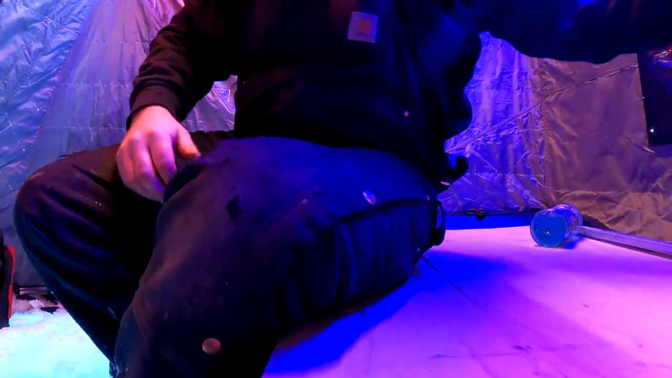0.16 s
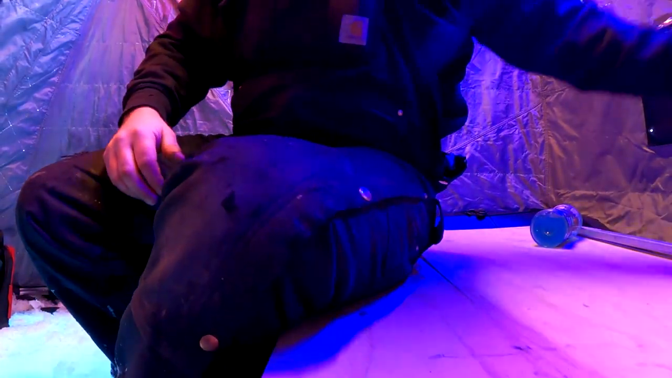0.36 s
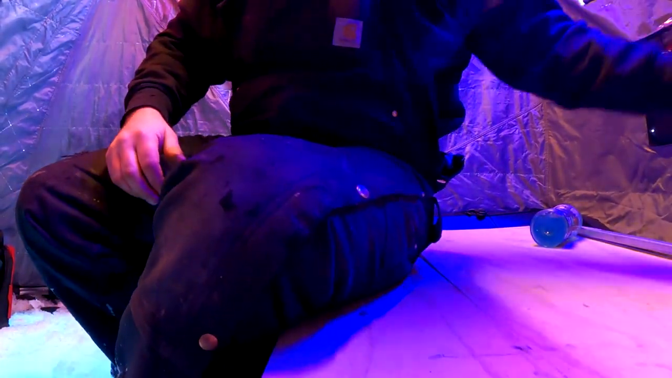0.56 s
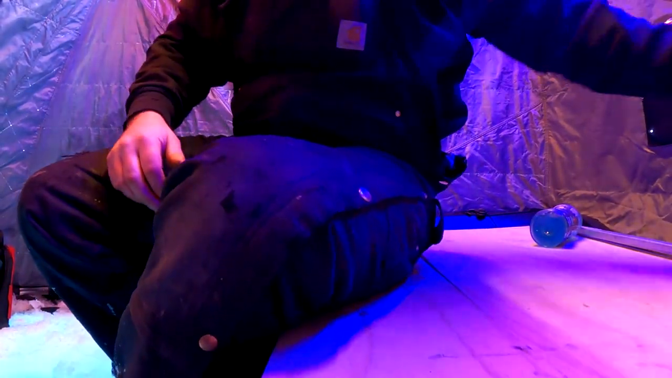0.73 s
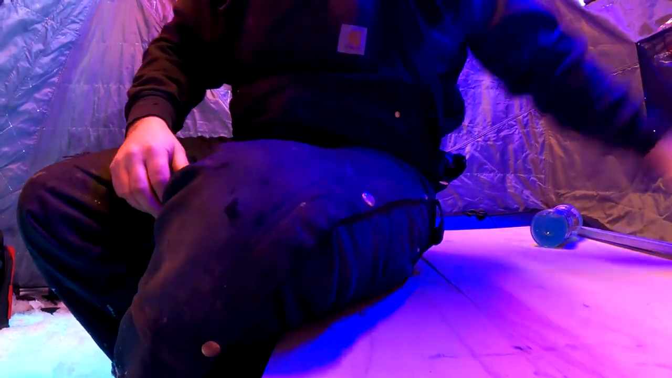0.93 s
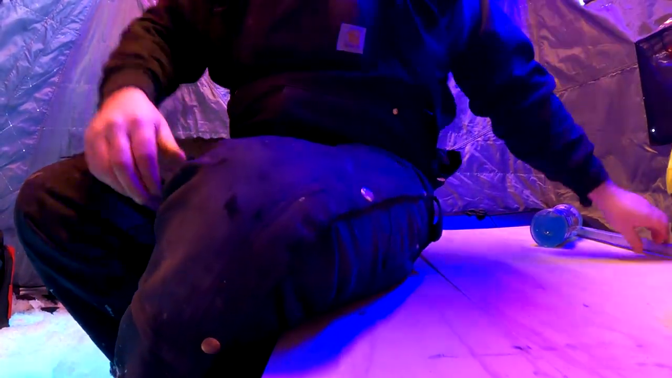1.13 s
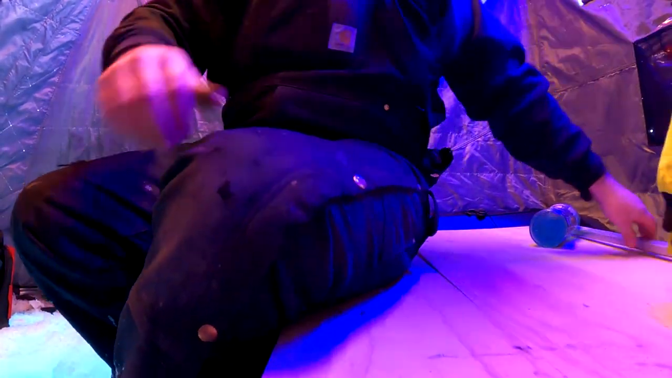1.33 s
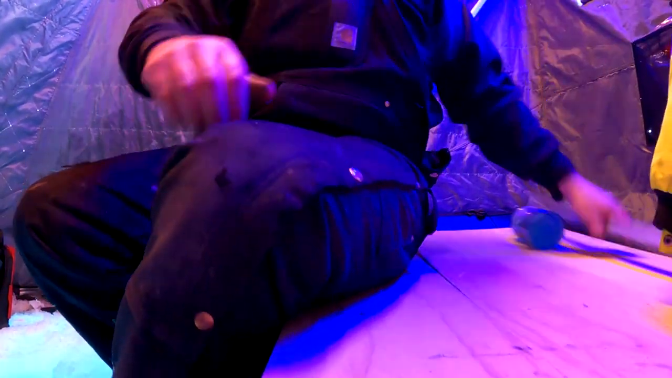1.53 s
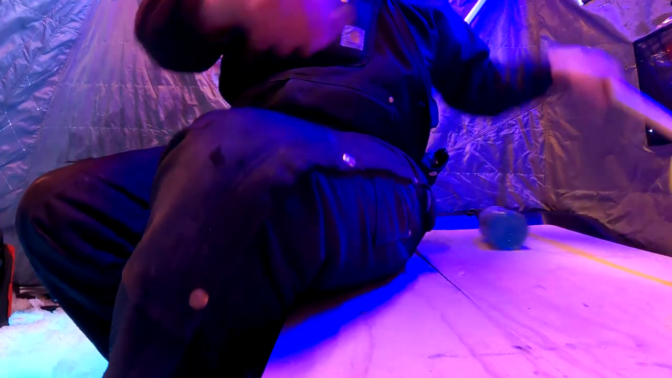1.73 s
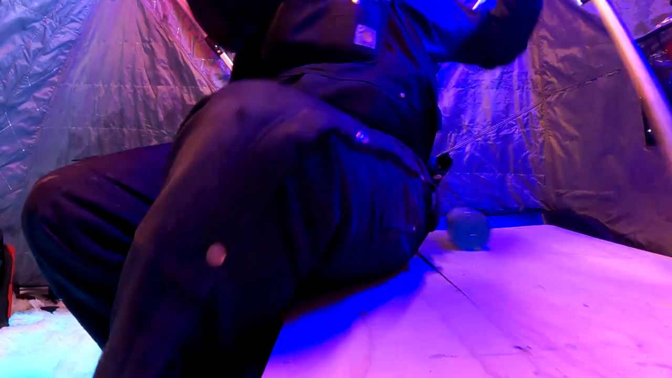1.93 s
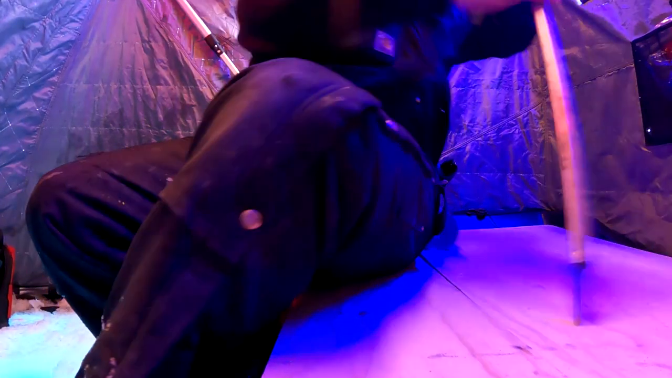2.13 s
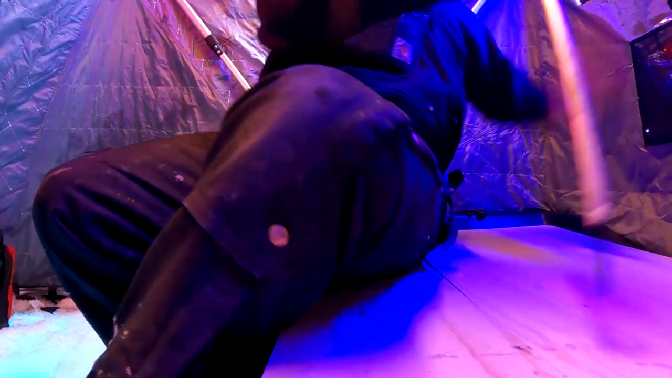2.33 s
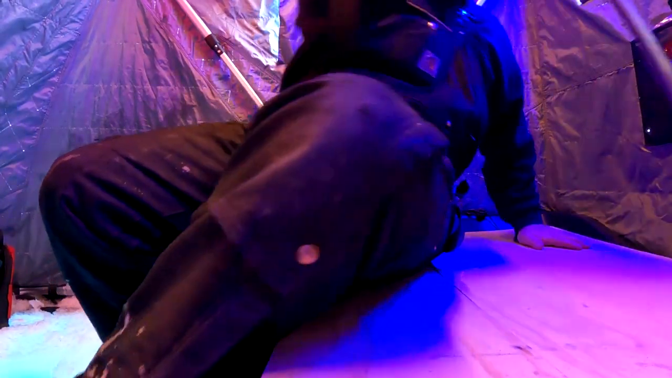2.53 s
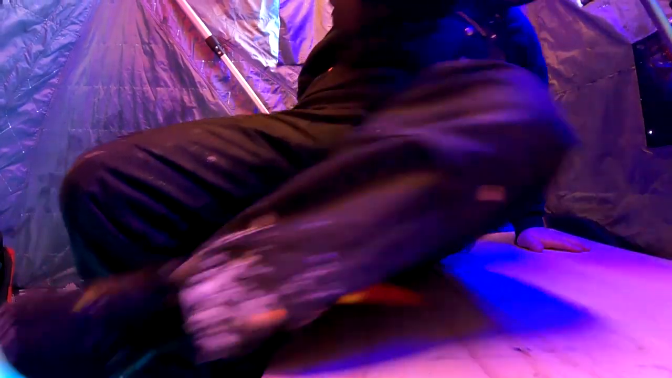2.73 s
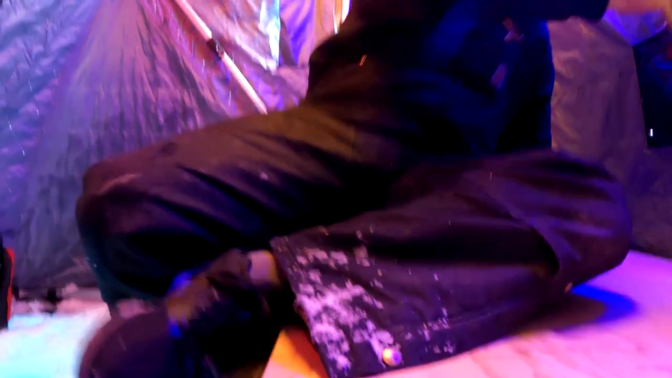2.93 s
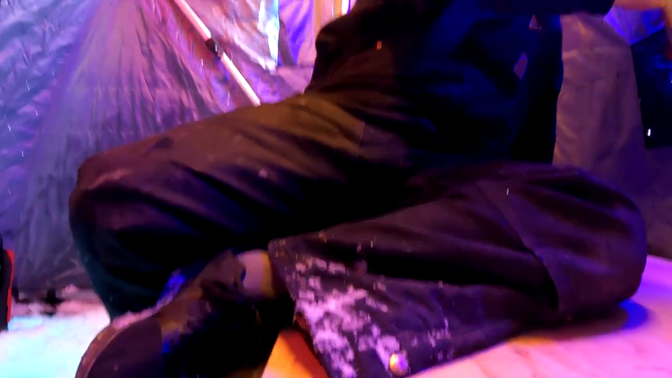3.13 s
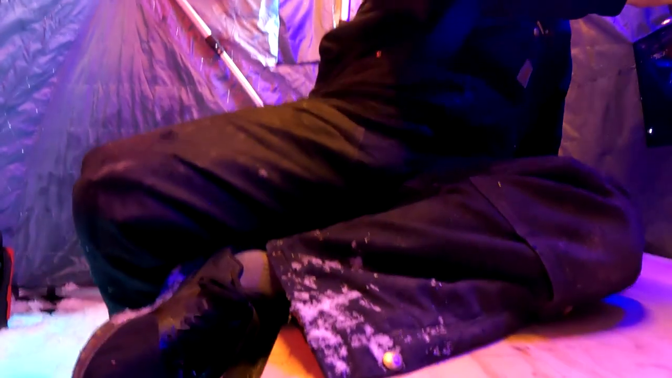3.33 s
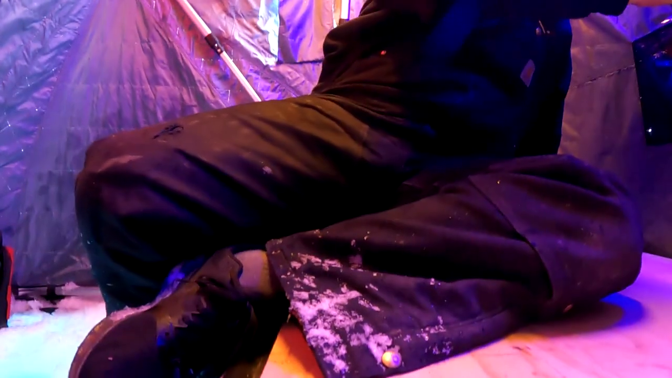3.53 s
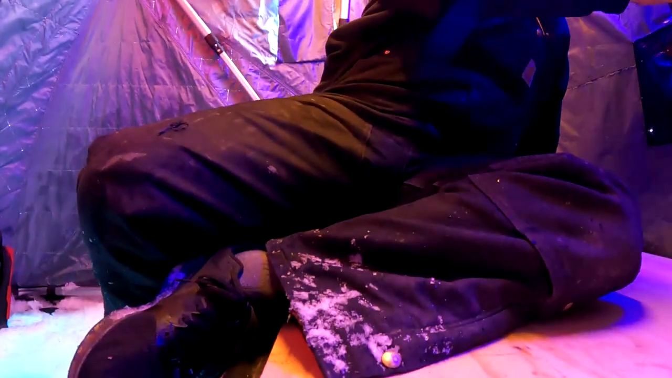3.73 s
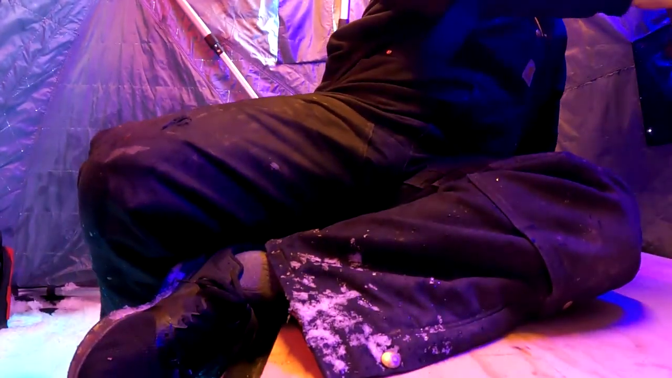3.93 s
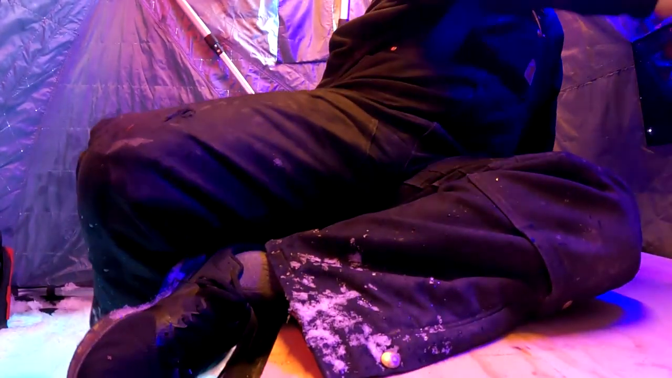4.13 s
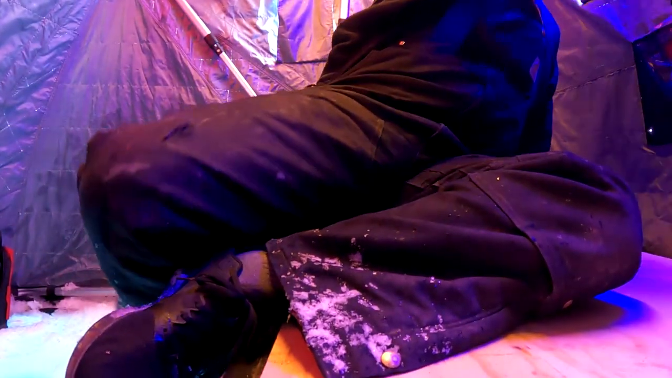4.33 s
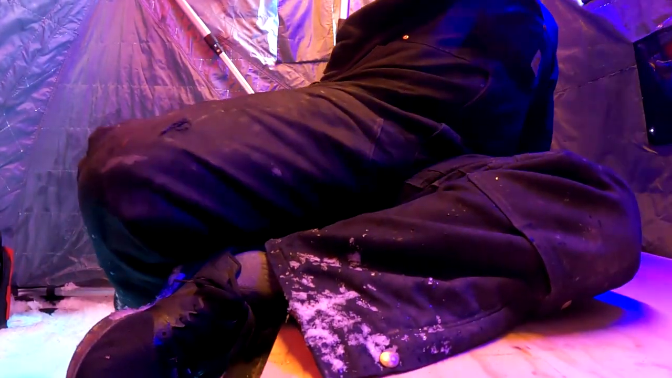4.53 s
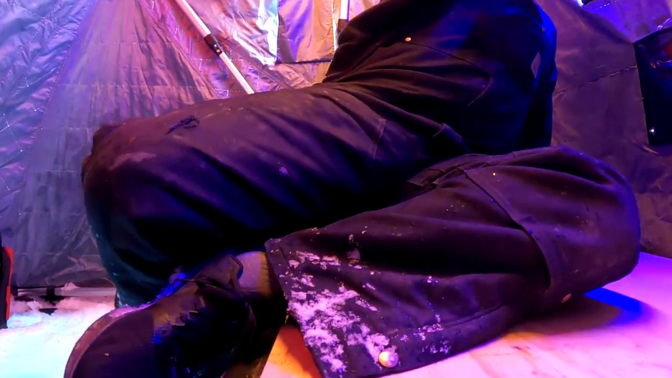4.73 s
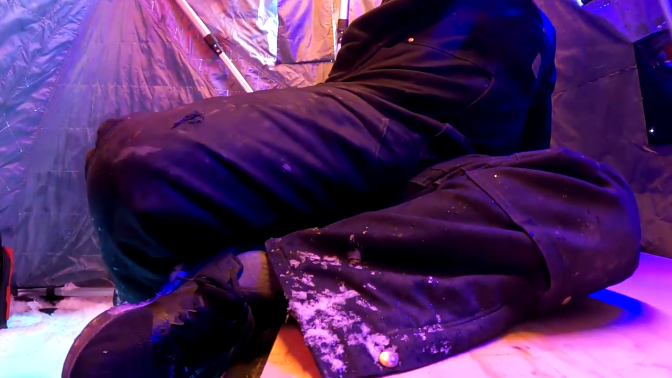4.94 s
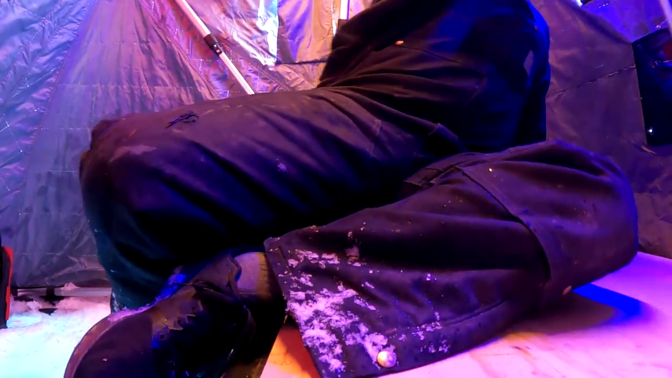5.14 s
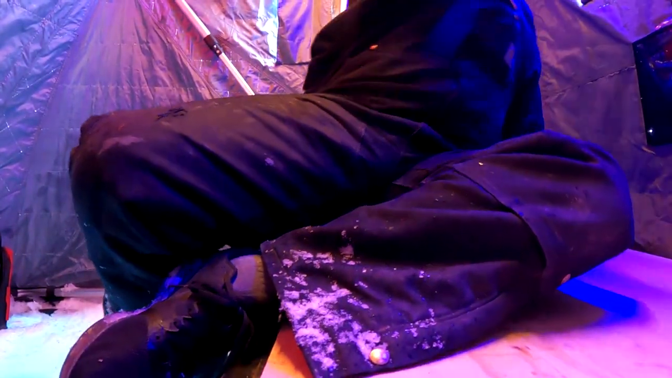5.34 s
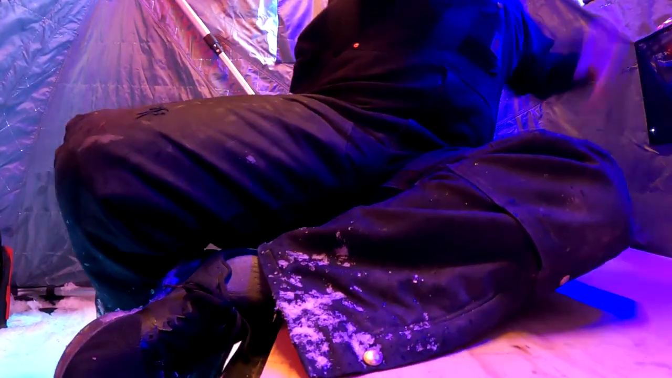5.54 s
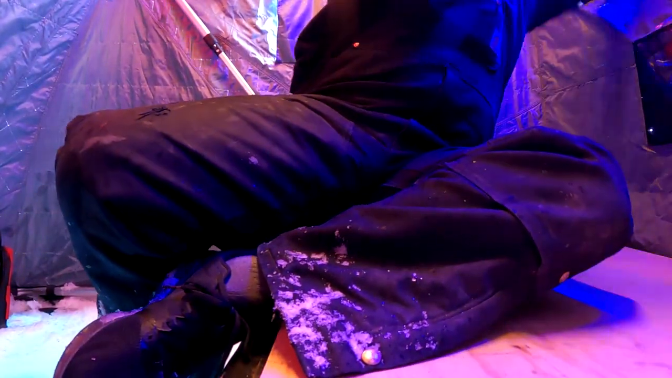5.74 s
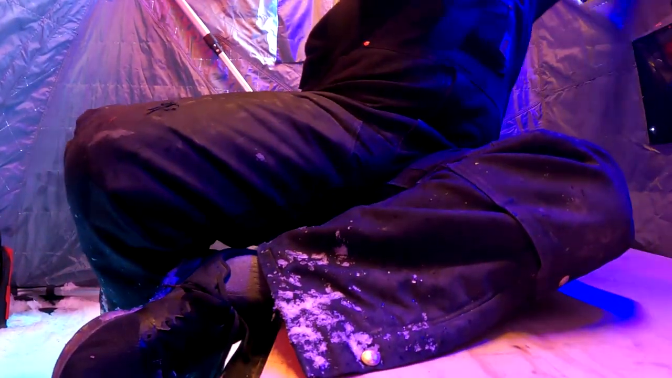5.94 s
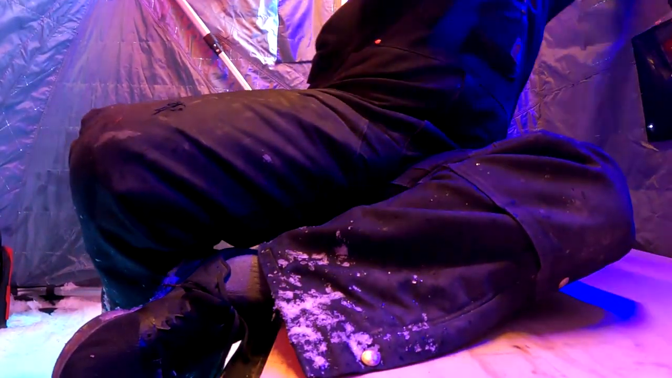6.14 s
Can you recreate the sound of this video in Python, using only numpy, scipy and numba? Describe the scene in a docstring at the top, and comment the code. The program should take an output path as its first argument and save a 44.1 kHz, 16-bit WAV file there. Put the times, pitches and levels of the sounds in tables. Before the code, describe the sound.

Close dull knocks on wooden boards, small hard clicks and rubbing heavy clothing as a person turns, drops a heel and settles in a tent.

```python
"""Thumps on a hollow board floor, with a boot heel slap and hard gear clicks, as someone shifts about
inside a small padded shelter, close to the microphone. Board modes ring after short pushes; clicks are noise bursts.
Weight drags in jerky friction, a rod scrapes and a sliding thing sinks in pitch: noise through resonances.
Cloth slides and crackles as filtered noise with sudden bursts; a faint steady hiss lies under it all."""
import sys
import numpy as np
from scipy import signal
from scipy.fft import rfft, irfft, next_fast_len
from scipy.io import wavfile
from scipy.ndimage import uniform_filter1d
from numba import njit

SR = 44100
rng = np.random.default_rng(int(sys.argv[2]) if len(sys.argv) > 2 else 0)


def transcribe(signal):
    """Save signal, clipped to [-1, 1], as a 16-bit WAV file at the path in sys.argv[1]."""
    frames = np.atleast_2d(signal).T
    limited = np.clip(frames, -1, 1)
    pcm = np.round(limited * 32767).astype(np.int16)
    wavfile.write(sys.argv[1], SR, pcm)


N = 276507
T = np.arange(N) / SR  # seconds


def undb(db):
    """Decibels to an amplitude factor."""
    return 10 ** (np.asarray(db) / 20)


def unit(x):
    """Scale to an RMS of 1."""
    return x / np.sqrt(np.mean(x ** 2))


def band(x, lo_hz, hi_hz, order=2):
    """Butterworth band-pass."""
    edges = [lo_hz, min(hi_hz, .45 * SR)]
    return signal.sosfilt(signal.butter(order, edges, "bandpass", fs=SR, output="sos"), x)


def colour(x, points):
    """Shape the spectrum by (Hz, dB) points joined on a log-frequency axis."""
    hz, db = np.transpose(points)
    size = next_fast_len(len(x))
    bins_hz = np.arange(size // 2 + 1) * SR / size + 1  # + 1 avoids log(0)
    gain = undb(np.interp(np.log(bins_hz), np.log(hz), db))
    return irfft(rfft(x, size) * gain, size)[:len(x)]


def ring(x, hz, t60):
    """One mode driven by x, decaying 60 dB in t60 seconds."""
    pole = np.exp(2j * np.pi * hz / SR - np.log(1000) / (t60 * SR))
    return signal.lfilter([1], [1, -pole], x).imag


@njit
def sweep(x, hz, q):
    """State-variable band-pass whose centre follows hz, sample by sample."""
    y, b, l = np.empty(len(x)), 0., 0.
    for i in range(len(x)):
        g = np.tan(np.pi * hz[i] / SR)
        v = (b + g * (x[i] - l)) / (1 + g * (g + 1 / q))
        b, l, y[i] = 2 * v - b, l + 2 * g * v, v / q
    return y


def walk(rate):
    """Random levels held 1 / rate seconds with slewed steps, RMS 1."""
    hold = int(SR / rate)
    steps = np.repeat(rng.standard_normal(N // hold + 1), hold)
    return unit(uniform_filter1d(steps, hold)[:N])


def slips(rate, spread_db, tail_s):
    """Envelope of sudden stick-slip bursts, about rate a second, uneven in size, that die away fast."""
    when, size = rng.random(N), rng.exponential(size=N)
    kicks = (when < rate / SR) * undb(np.minimum(spread_db * size, 12))
    return unit(signal.lfilter([1], [1, -np.exp(-1 / (tail_s * SR))], kicks))


def curves(table):
    """Each column after the time, joined by straight lines over the whole scene."""
    s, *columns = np.transpose(table)
    return [np.interp(T, s, c) for c in columns]


def during(table):
    """True from the first row to the last."""
    return (T > table[0][0]) * (T < table[-1][0])


def add(out, s, x):
    """Mix x into out from s seconds on."""
    i = int(s * SR)
    out[i:i + len(x)] += x[:len(out) - i]


SWING_DB = 30  # a rise or fall spans this much


def stroke(s, rise, hold, fall, db):
    """Gain of one movement: swells to full level at s, holds, dies away."""
    rise, fall = max(rise, .002), max(fall, .002)
    times = np.cumsum([s - rise, rise, max(hold, .001), fall])
    shape_db = np.interp(T, times, [-SWING_DB, 0, 0, -SWING_DB])
    return (T > times[0]) * (T < times[-1]) * undb(db + shape_db)


# The floor boards, as modes from low to high. Each row: nominal pitch in Hz, level in dB, relative ring time.
BOARD_MODES = [(83.5, 0, 1.07), (124.7, -7.5, 1.4), (139.7, -19.5, 1.02), (156.2, -7, 1.22),
               (193.5, -1.5, 0.88), (238.5, -1.5, 0.95), (286.8, -0.5, 0.85), (350, -3.5, 0.89),
               (407, -3.5, 0.94), (504, -0.5, 0.65), (581, 1.5, 0.78), (666, 4.5, 0.22), (815.6, 3, 0.49)]
# Blows on the boards close by. Each row: start in seconds, level in dB, best excited pitch in Hz,
# lowest mode level in dB, upper modes level in dB (both before the row's level), base ring time in seconds.
THUMP_BLOWS = [(0.071, -24.5, 225, -27, 4, 0.27), (0.135, -17, 372, -34, -3, 0.078),
               (0.459, -28.5, 350, -22, 2, 0.057), (0.793, -29, 310, -27, 5, 0.3),
               (1.131, -22.5, 288, 3, -9, 0.38), (1.162, -13.5, 412, -0.5, -16, 0.23),
               (1.384, -15.5, 420, -5.5, -13.5, 0.38), (1.462, -13.5, 367, -12, -20, 0.3),
               (1.514, -23, 226, -12, -24, 0.17), (1.545, -10, 236, -14, -9.5, 0.3),
               (1.59, -16, 213, -12, -11, 0.35), (1.768, -27.5, 300, -6, -24, 0.4),
               (1.947, -31.5, 360, -6, 0.5, 0.17), (2.107, -22.5, 150, -4.5, -12, 0.21),
               (2.268, -4.5, 215, -13.5, -18, 0.2), (2.582, -16, 190, -18, -22, 0.37),
               (2.7, -14.5, 157, -6, -25, 0.2), (2.972, -7, 242, -2, -8, 0.035),
               (2.994, -13.5, 167, -6, -27, 0.045), (3.041, -15.5, 211, -1, -8.5, 0.14),
               (3.138, -28, 358, -21, 6, 0.074), (3.257, -17, 285, -12.5, -8.5, 0.23),
               (3.437, -30.5, 282, -25, -12, 0.083), (3.504, -22, 300, -9, -15, 0.3),
               (3.815, -32.5, 292, -11, -15, 0.36), (4.176, -4.5, 176, -10, -11.5, 0.31),
               (4.214, -13.5, 342, -5, -6, 0.19), (4.723, -25.5, 186, -7, -11.5, 0.19),
               (4.817, -35, 358, -3, -3, 0.26), (5.044, -26, 268, -7, -7.5, 0.21),
               (5.356, -35.5, 301, -24, 6, 0.13), (5.424, -31.5, 179, -16, 1.5, 0.11),
               (5.5, -10, 250, -13, -12, 0.07), (5.545, -28.5, 164, -19, -9.5, 0.19),
               (5.931, -32, 255, -31, -22, 0.29), (6.206, -29, 280, -13, -1, 0.055)]


def thumps():
    """Each blow is a short rattling push; where it lands sets how strongly each board mode answers."""
    out = np.zeros(N)
    luck = rng.standard_normal((len(THUMP_BLOWS), 2, len(BOARD_MODES)))
    t = np.arange(SR // 2) / SR
    for (s, db, best_hz, low_db, high_db, t60), (tune, weight) in zip(THUMP_BLOWS, luck):
        rattle = 0.014 * rng.standard_normal(len(t)) * np.exp(-t / 0.0174)
        push = (t < .0009) + rattle
        modes = []
        for k, (hz, mode_db, long) in enumerate(BOARD_MODES):
            match_db = -12 * min(abs(np.log2(hz / best_hz)), .8)
            gain = undb(mode_db + match_db + 2.75 * weight[k])
            mode = ring(push, hz * (1 + 0.027 * tune[k]), max(t60, .02) * long)
            # neighbouring modes start in opposite directions
            modes.append((-1) ** k * gain * mode)
        parts = [(modes[0], low_db), (sum(modes[1:9]), 0), (sum(modes[9:]), high_db)]
        add(out, s, undb(db) * sum(undb(g) * p / np.abs(p).max() for p, g in parts))
    return out


# A boot heel slaps down. One row: start in seconds, level in dB, pitch in Hz, ring time in seconds.
HEEL_SLAP = (2.9697, 1, 734, 0.0082)


def heel():
    """A hard flat slap: one cosine that decays within a few swings."""
    s, db, hz, t60 = HEEL_SLAP
    out, t = np.zeros(N), np.arange(SR // 20) / SR
    decay = np.exp(-np.log(1000) * t / t60)
    add(out, s, undb(db) * np.cos(2 * np.pi * hz * t - 1.2) * decay)
    return out


# Hard gear near the microphone. Each row: time of the snap in seconds, level in dB, centre pitch in Hz,
# treble level in dB relative to the body, ring time in seconds.
GEAR_CLICKS = [(0.074, -14, 2690, -5, 0.17), (0.167, -14, 2930, -15, 0.026),
               (0.4068, -16.5, 4150, -3, 0.044), (0.913, -23.5, 3090, -5, 0.034),
               (1.131, -15.5, 2260, -18, 0.012), (1.3855, -24, 1560, -15, 0.044),
               (1.4923, -16.5, 1830, -16, 0.046), (1.5552, -16.5, 915, -20, 0.027),
               (1.672, -16.5, 2660, -9.5, 0.025), (1.6884, -22, 1470, -10, 0.048),
               (1.7659, -19.5, 1390, -7, 0.065), (1.8766, -30.5, 3110, -4.5, 0.12),
               (1.9501, -22, 3020, -10, 0.045), (2.1088, -19, 3000, -14, 0.057),
               (2.272, -16, 1550, -16, 0.06), (2.3256, -30, 1520, -10, 0.062),
               (2.5826, -21, 2130, -20.5, 0.04), (2.6002, -17.5, 2060, -22, 0.028),
               (2.6257, -18, 2000, -22, 0.027), (2.7838, -10, 2830, -2, 0.012),
               (2.819, -21, 1670, -12, 0.02), (2.969, -3.5, 1480, -18, 0.011),
               (3.0422, -23.5, 1490, -8, 0.029), (3.1416, -27.5, 925, -22, 0.032),
               (3.19, -28, 1220, -8, 0.028), (3.2573, -19, 2420, -13, 0.029),
               (3.3025, -30, 7000, -10, 0.011), (3.339, -34.5, 2500, -5, 0.014),
               (3.4994, -32, 1850, -15, 0.11), (3.6017, -32, 2560, -29, 0.032),
               (3.65, -35, 1200, -18, 0.026), (4.0635, -23.5, 2130, -2, 0.081),
               (4.1266, -26, 1060, -13, 0.12), (4.1782, -8, 1190, -20, 0.033),
               (4.2134, -26.5, 1510, -16, 0.045), (4.538, -40, 920, -9, 0.034),
               (4.7315, -35, 4400, -1, 0.089), (4.785, -38, 5200, -2, 0.017),
               (4.8185, -14, 2920, -14, 0.024), (4.9604, -33.5, 2900, -12, 0.039),
               (5.043, -32.5, 3400, -15, 0.024), (5.3396, -29, 4300, 1.5, 0.05),
               (5.3618, -23, 2720, -7, 0.025), (5.4165, -28, 2540, -16, 0.077),
               (5.432, -26, 1060, -20, 0.018), (5.501, -29.5, 1490, -17, 0.037),
               (5.5473, -20.5, 1930, -16, 0.018), (5.6038, -24, 2700, -8, 0.018),
               (5.947, -40.5, 4270, 7, 0.12), (5.9966, -20.5, 2240, -14, 0.011),
               (6.064, -37.5, 3850, 5, 0.03)]


def clicks():
    """Parts scratch together, snap, and ring roughly around the centre pitch of the struck one."""
    out, lead = np.zeros(N), .012  # seconds of scratch before the snap
    t = np.arange(SR // 7) / SR - lead
    after = np.maximum(t, 0)
    scratch = undb(-23.5) * np.exp(np.minimum(t, 0) / 0.01) * (t < .001)
    snap = 0.91 * (t >= 0) * (t < .00012)
    noises = rng.standard_normal((len(GEAR_CLICKS), len(t)))
    for (s, db, hz, top_db, t60), noise in zip(GEAR_CLICKS, noises):
        decay = np.exp(-np.log(1000) * after / max(t60, .005))
        rattle = (1 - np.exp(-after / 0.0011)) * decay
        burst = noise * (scratch + rattle) + snap
        body = band(burst, hz / 1.06, hz * 1.043, order=1) + 0.5 * band(burst, 655, 3440, order=3)
        top = band(burst, 2330, 5470, order=3)
        click = body / np.abs(body).max() + undb(top_db) * top / np.abs(top).max()
        add(out, s - lead, undb(db) * click)
    return out


# The body never quite rests. Each row: time in seconds, level of the faint rustle in dB.
FIDGET_LEVEL = [(0, -54), (1, -60), (1.2, -47.5), (1.35, -56), (1.75, -56.5), (2.1, -53.5), (2.3, -57),
                (2.55, -56), (3.3, -53.5), (3.6, -62), (3.9, -62), (4.05, -58.5), (4.5, -57.5), (4.65, -66),
                (4.9, -62.5), (5.3, -55), (5.8, -60), (6.27, -52.5)]
# dB relative to the rustle
FIDGET_FLUTTER_DB, FIDGET_SHEEN_DB, FIDGET_DRAG_DB, FIDGET_LOW_DB = -1.5, -9.5, 2.5, -7.5


def gains(table, rest_db):
    """Gain of each layer: the powers of the strokes and the fidgeting added up."""
    power = np.outer(undb(rest_db), undb(curves(FIDGET_LEVEL)[0])) ** 2
    for s, rise, hold, fall, db, *rel_db in table:
        power = power + np.outer(undb([0, *rel_db]), stroke(s, rise, hold, fall, db)) ** 2
    return np.sqrt(power)


# Weight dragging over the boards; the row at 4.33 s instead keeps the lowest mode humming on after the heavy
# blows. Each row: time of full level in seconds, rise, hold and fall in seconds, level in dB, lowest mode in dB
# relative to it.
DRAG_STROKES = [(0.0, .05, .42, 0.14, -43, -33), (.82, 0.29, 0.083, 0.1, -40, -28),
                (1.23, 0.095, 0.014, 0.11, -30.5, -28), (1.56, 0.18, 0.018, .15, -13, -23),
                (2.75, 0.12, .03, 0.2, -36.5, -20), (3.04, 0.091, 0.052, 0.3, -29.5, -24),
                (3.53, 0.24, 0.027, 0.17, -40.5, -4), (3.83, 0.59, 0.051, 0.3, -46.5, -10),
                (4.26, 0.12, .03, 0.074, -36, -4), (4.33, 0.11, 0.034, 0.2, -60, 21.5),
                (5.36, 0.23, 0.18, .3, -46.5, -18), (5.95, 0.044, .32, 0.073, -48, -12)]


def drag():
    """Jerky friction shakes the nine lowest board modes."""
    main, low = gains(DRAG_STROKES, [FIDGET_DRAG_DB, FIDGET_LOW_DB])
    push = rng.standard_normal(N) * (0.43 + 0.78 * slips(rate=45, spread_db=1.5, tail_s=0.012))
    modes = [undb(db) * unit(ring(push, hz, 0.065 * long)) for hz, db, long in BOARD_MODES[:9]]
    return main * unit(sum(modes[1:])) + low * unit(modes[0])


# Resonances of a hard rod. Each row: centre in Hz, half width in Hz, level in dB.
ROD_BANDS = [(810, 100, 11.5), (1120, 150, 12), (1730, 200, -1), (1990, 150, -7.5), (2460, 66, -13)]
# The rod scraping along the boards. Each row: time of full level in seconds, rise, hold and fall in seconds,
# stroke level in dB, favoured band in Hz.
ROD_SCRAPES = [(1.165, 0.035, 0.027, 0.029, -34.5, 2150), (1.222, .025, 0.023, 0.036, -36.5, 2260),
               (1.268, 0.0088, .004, .02, -47, 2400), (1.42, .03, 0.017, .05, -39.5, 2200),
               (1.493, 0.14, 0.026, 0.14, -27.5, 1850), (3.147, .08, .002, 0.041, -42, 1130),
               (3.742, 0.062, 0.12, .02, -52, 2920)]


def scrapes():
    """Coarse grit chatters into the resonances of the rod; the grip decides which one leads."""
    grit = rng.standard_normal(N) * (.5 + 2.5 * slips(rate=340, spread_db=10.5, tail_s=0.0064))
    bands = [undb(db) * unit(band(grit, hz - half, hz + half, order=1)) for hz, half, db in ROD_BANDS]
    rod = unit(sum(bands))
    out = 0
    for *shape, hz in ROD_SCRAPES:
        grip_hz = np.full(N, 1. * hz)
        favoured = sweep(sweep(rod, grip_hz, 1.47), grip_hz, 1.47)
        out = out + stroke(*shape) * (0.27 * rod + 2.3 * favoured)
    return out


# A short scrape that sinks in pitch as the thing slides down.
# Each row: time in seconds, level in dB, pitch in Hz.
SLIDE_PATH = [(4.082, -60, 2700), (4.09, -34, 2530), (4.112, -38, 1900), (4.119, -55, 1500),
              (4.127, -33.5, 1090), (4.15, -35, 795), (4.175, -28, 524), (4.19, -70, 450)]


def slide():
    """Friction noise in a resonance that falls."""
    db, hz = curves(SLIDE_PATH)
    friction = sweep(sweep(rng.standard_normal(N), hz, 2.9), hz, 2.9)
    # the root evens out the wider band at high pitch
    return during(SLIDE_PATH) * undb(db) * unit(friction / np.sqrt(hz))


# Tone of the swish before its band-pass. Each row: frequency in Hz, gain in dB.
SWISH_TONE = [(530, 16.5), (900, -20), (1220, 3.5), (1940, 2.5), (2700, 4), (2970, -1), (3790, 2),
              (5950, -12), (8500, -19), (11000, -28), (18700, -120)]
# Cloth sliding. Each row: time of full level in seconds, rise, hold and fall in seconds, swish level in dB,
# low flutter and top sheen in dB relative to it.
CLOTH_STROKES = [(0.0, .05, 0.39, .12, -36, -1.5, 1.5), (.43, 0.066, 0.046, 0.028, -54, 8.5, 9.5),
                 (.69, 0.26, 0.035, .2, -49, 3, 7), (.8, 0.3, 0.029, 0.33, -40, 4.5, -2.5),
                 (.91, 0.071, 0.026, 0.053, -44, -7, 8), (1.47, 0.13, 0.067, 0.18, -36.5, 1.5, -20),
                 (2.63, .1, .06, .2, -37, 1.5, -11), (2.7, 0.13, 0.088, .05, -31.5, 2, -17),
                 (2.85, 0.11, 0.12, 0.03, -36, 1, -11.5), (3.11, 0.069, 0.19, 0.037, -46.5, 5, -19),
                 (4.01, 0.015, 0.018, 0.045, -49.5, -3, -27), (4.13, 0.033, 0.052, .05, -40.5, -9, -12.5),
                 (4.2, .03, 0.032, 0.068, -46.5, 19, -28), (4.29, 0.065, 0.032, 0.21, -34, -9.5, -5),
                 (4.41, 0.031, 0.052, 0.068, -47.5, -1, 1.5), (4.74, 0.095, .1, 0.15, -52.5, 2, -4),
                 (5.343, .01, .03, 0.064, -50, -3, 1), (5.39, .05, 0.12, 0.56, -50.5, 1.5, -16),
                 (5.95, 0.096, 0.046, .2, -53.5, 2, -0.5), (6.07, 0.11, .2, .1, -58.5, 1.5, 3)]


def cloth():
    """Fibres hiss as they slide and creases let go in small bursts; folds flutter lower."""
    main, low, top = gains(CLOTH_STROKES, [0, FIDGET_FLUTTER_DB, FIDGET_SHEEN_DB])
    grain = 2.4 + .5 * slips(rate=300, spread_db=21.0, tail_s=0.003)
    rub = rng.standard_normal(N) * grain * undb(1.3 * walk(45))
    swish = unit(band(colour(rub, SWISH_TONE), 900, 10200))
    sheen_tone = [(4500, -14.0), (6000, -13), (8000, -15.5), (10000, -19.0), (12000, -19.5), (14000, -36.0)]
    sheen = unit(colour(rub, sheen_tone))
    folds = 0.56 + 0.59 * slips(rate=140, spread_db=6.5, tail_s=0.0052)
    flutter = unit(band(rng.standard_normal(N) * folds, 255, 857))
    return main * swish + low * flutter + top * sheen


# Tone of the background. Each row: frequency in Hz, gain in dB.
HISS_TONE = [(24, -51), (40, -37), (117, -22.5), (149, 19), (317, 3.5), (516, 8.5), (1070, -41.5),
             (1150, -5), (3710, -53), (4300, 8.5), (9140, -63), (11700, -7.5), (13500, -37)]
HISS_DB = -62.5  # RMS level before the microphone's own shaping


def hiss():
    """Steady faint background of air and microphone: coloured noise."""
    return undb(HISS_DB) * unit(colour(rng.standard_normal(N), HISS_TONE))


# The microphone port. Each row: frequency in Hz, width in Hz, share of the resonance added (negative cuts).
PORT_PEAKS = [(8760, 2360, -0.52), (9180, 400, -1.0), (11700, 1000, 0.83)]


def scene():
    """All sources add up, pass the padded walls and microphone port, then spread slightly in stereo."""
    near = thumps() + heel() + clicks() + drag() + scrapes() + slide() + cloth()
    # padded walls give back only a short dull tail
    t = np.arange(SR // 8) / SR
    walls = band(rng.standard_normal(len(t)), 140, 7500, order=1) * np.exp(-t / 0.0097) * (t > .003)
    walls = walls / np.sqrt(np.sum(walls ** 2))
    near = near + undb(-13.0) * signal.fftconvolve(near, walls)[:N]
    for hz, width, share in PORT_PEAKS:
        near = near + share * signal.lfilter(*signal.iirpeak(hz, hz / width, SR), near)
    mid = near + hiss()
    # left and right differ mostly in the treble, where the balance flickers fast and leans right
    apart_tone = [(100, -50), (300, -50), (1000, -39), (4000, -28), (8000, -19), (12000, -8)]
    apart = colour(mid * walk(150), apart_tone)
    lean = colour(mid, [(6000, -60), (9500, -28), (12000, -16)])
    return np.array([mid + apart - lean, mid - apart + lean])


TOP_HZ = 13870  # the top is cut above this


def record(dry):
    """The microphone loses the deepest bass, the loudest peaks are rounded, and the top is cut."""
    thin = band(dry, 108.6, 11300, order=2)
    rounded = np.tanh(0.78 * thin) / 0.64
    return signal.sosfilt(signal.ellip(8, .2, 45, TOP_HZ, fs=SR, output="sos"), rounded)


dry = scene()
out = record(dry)
transcribe(out)
```